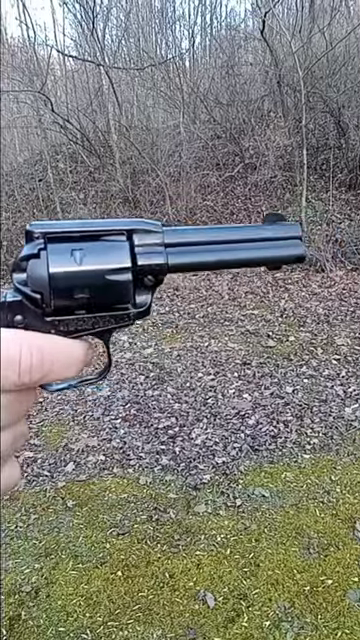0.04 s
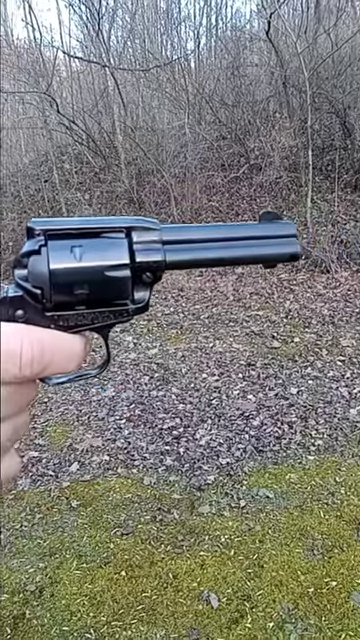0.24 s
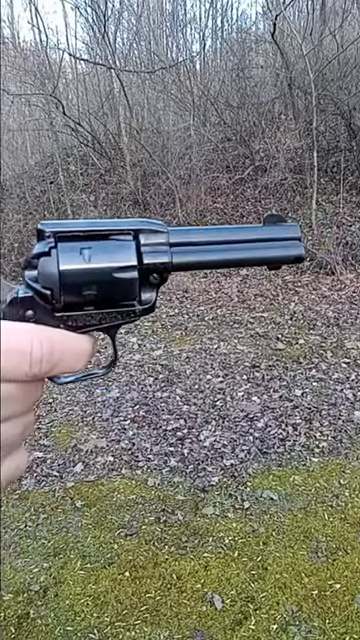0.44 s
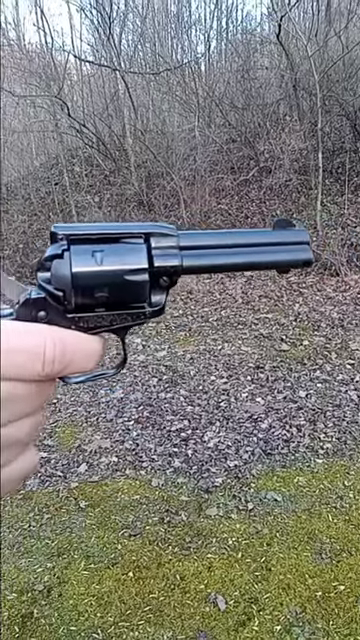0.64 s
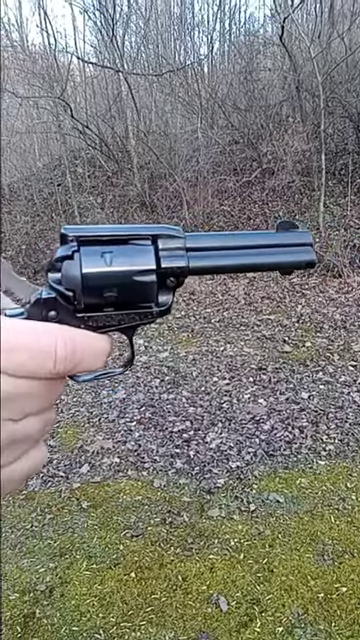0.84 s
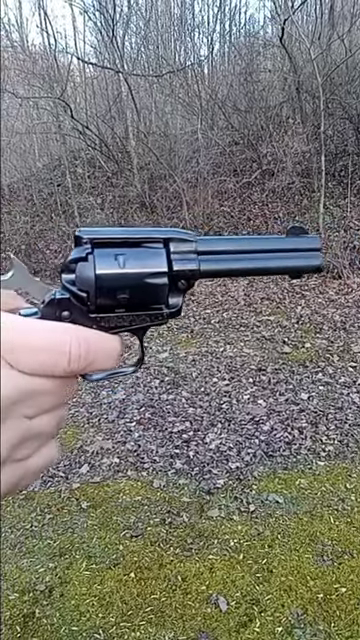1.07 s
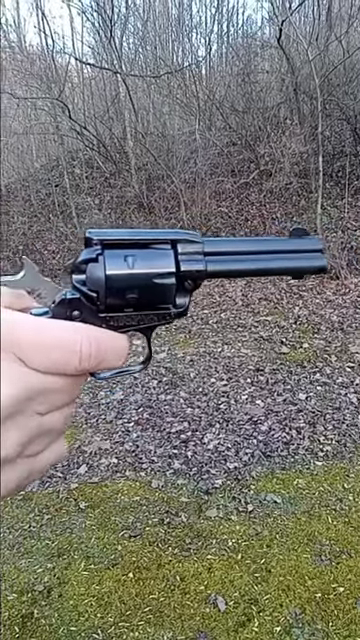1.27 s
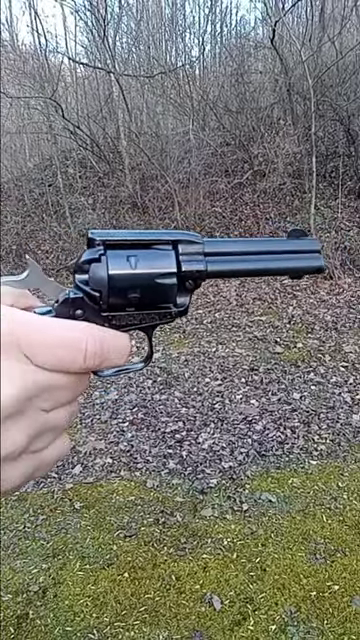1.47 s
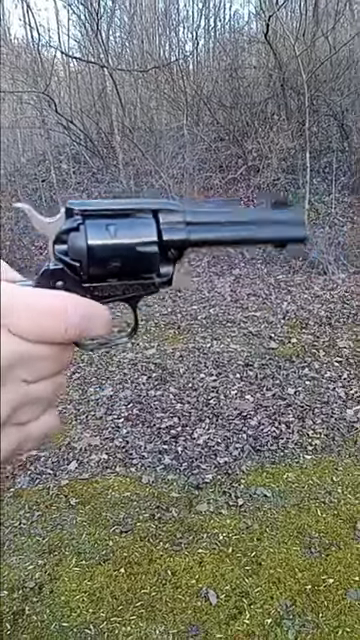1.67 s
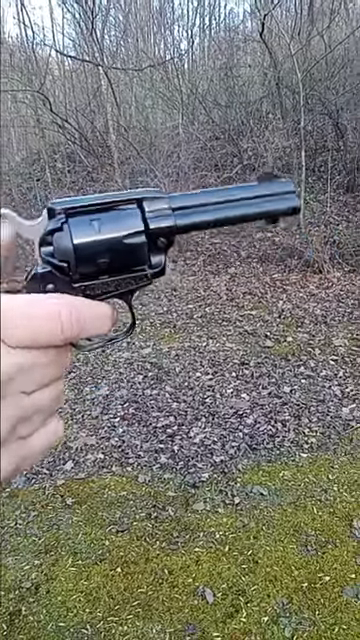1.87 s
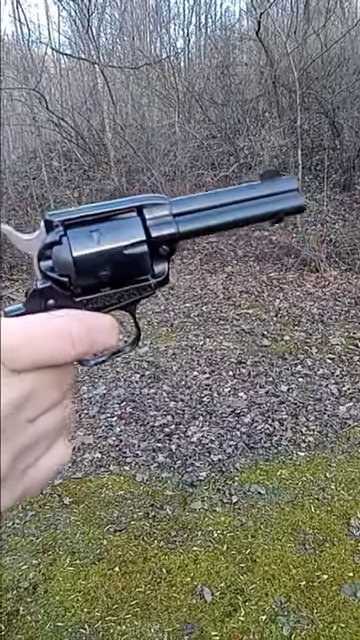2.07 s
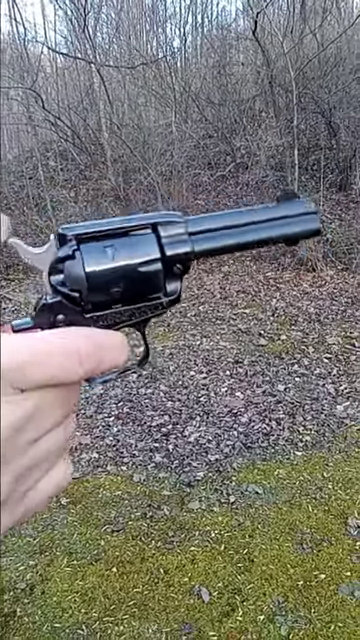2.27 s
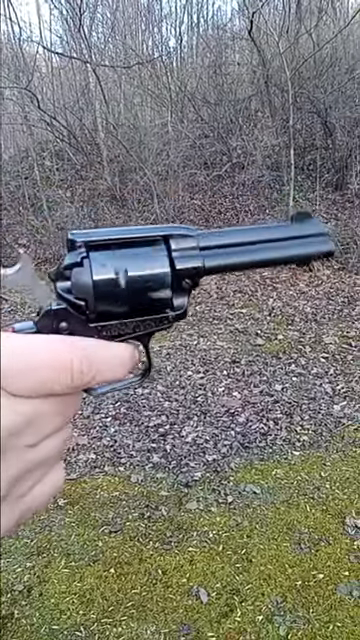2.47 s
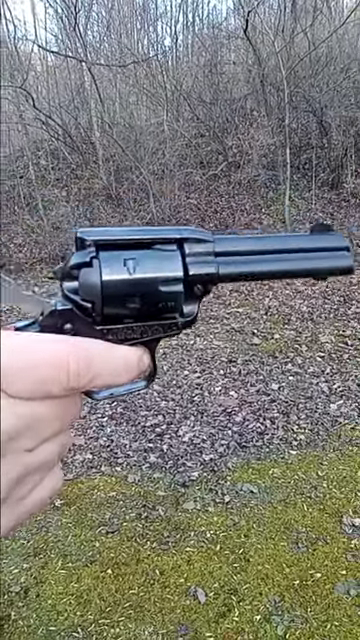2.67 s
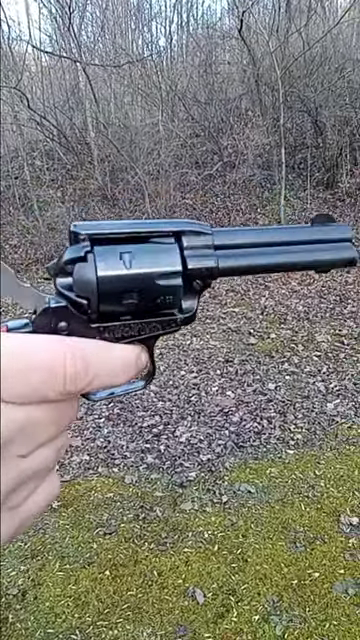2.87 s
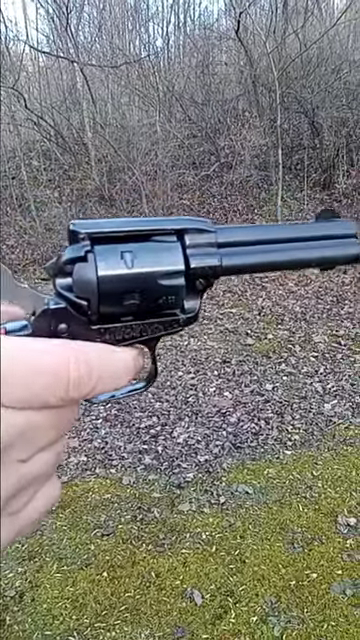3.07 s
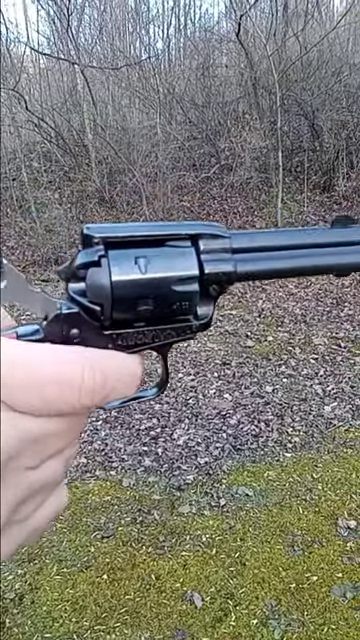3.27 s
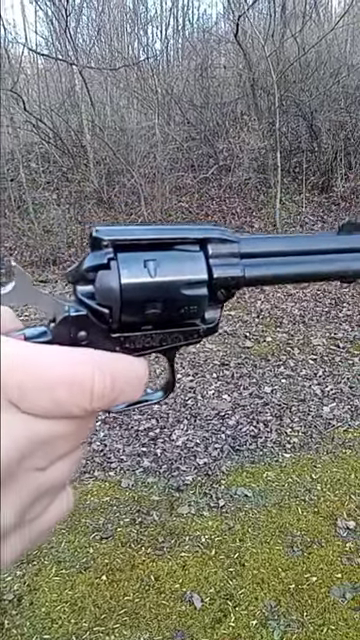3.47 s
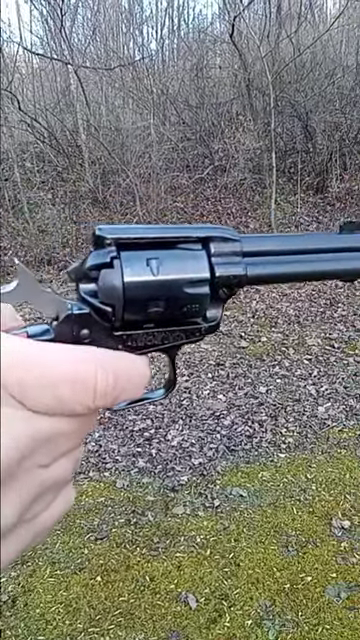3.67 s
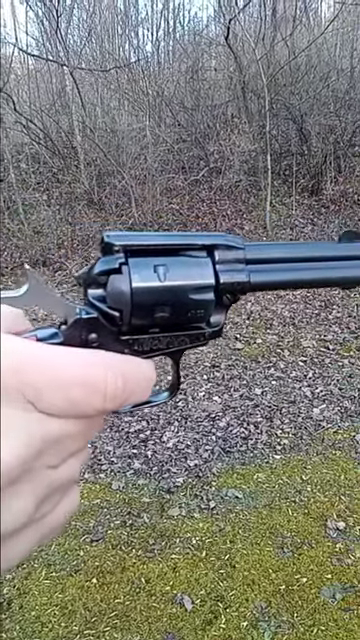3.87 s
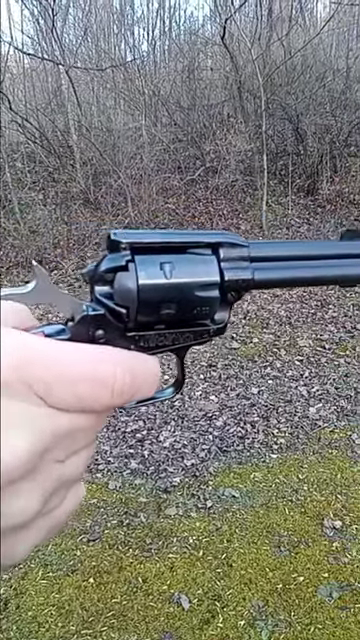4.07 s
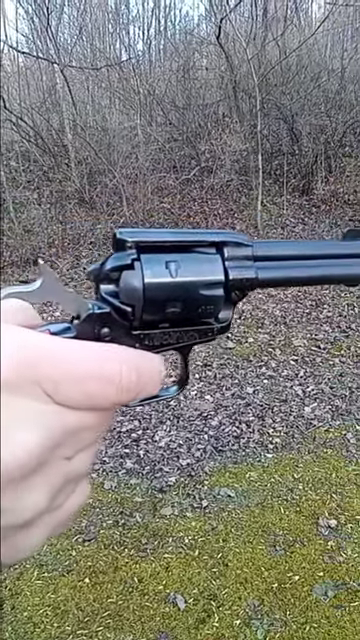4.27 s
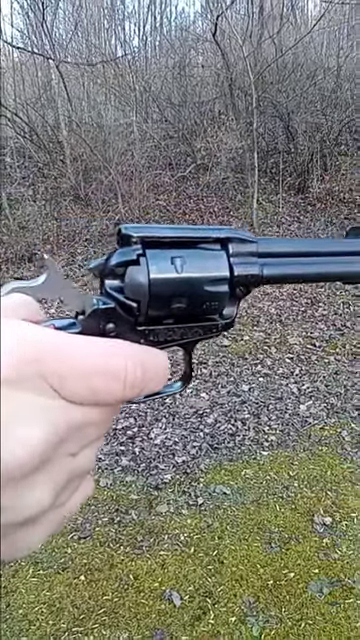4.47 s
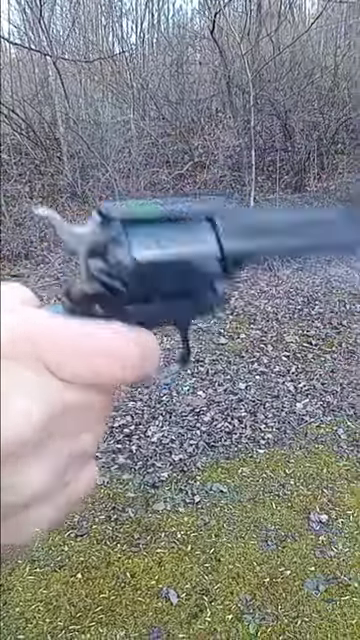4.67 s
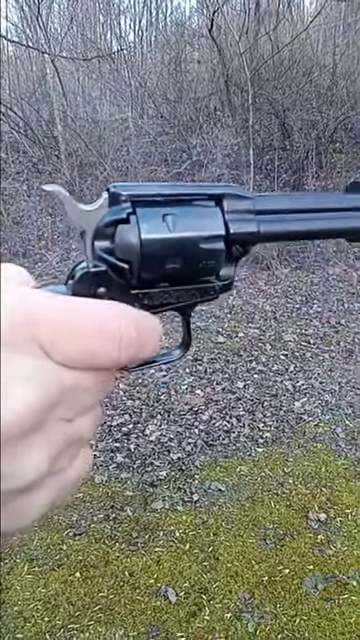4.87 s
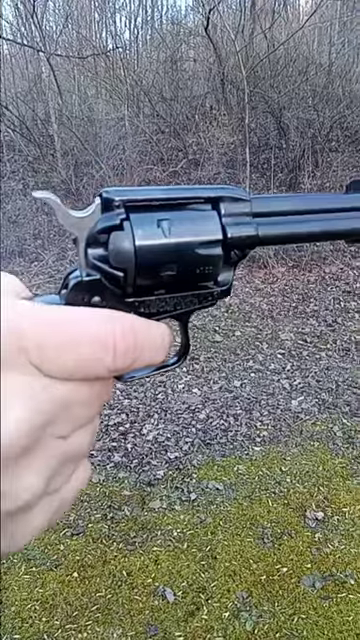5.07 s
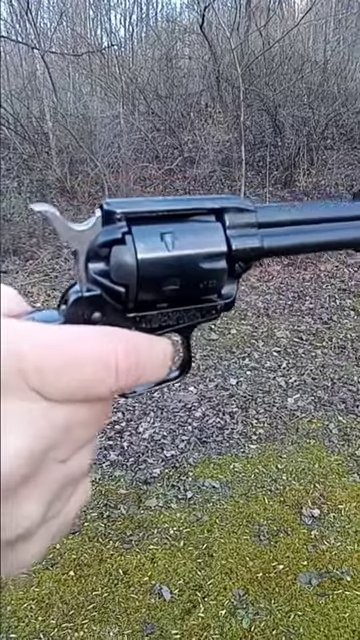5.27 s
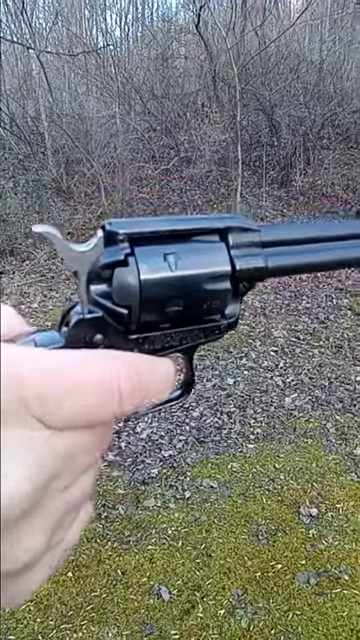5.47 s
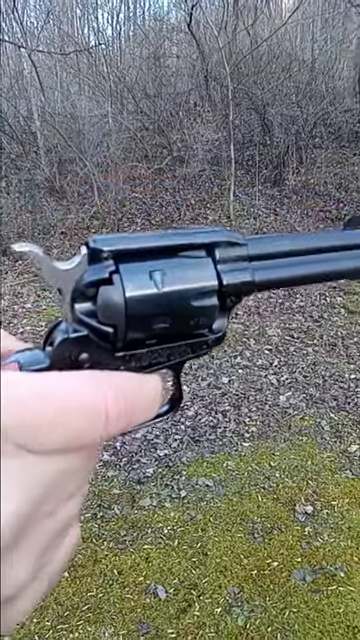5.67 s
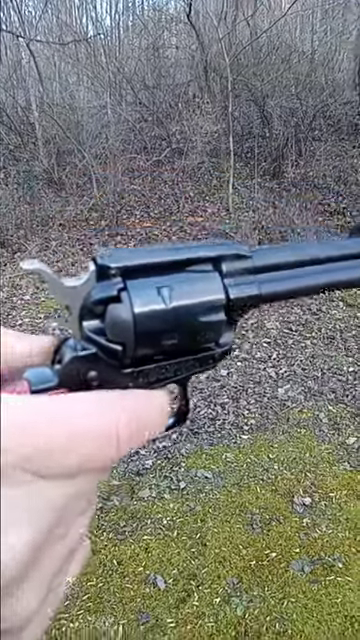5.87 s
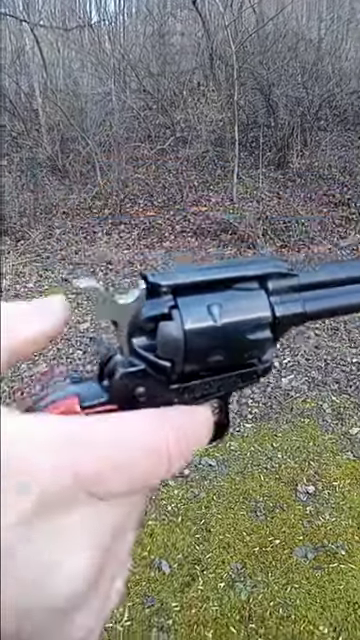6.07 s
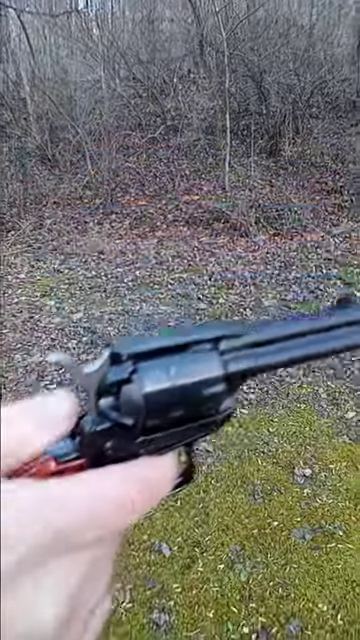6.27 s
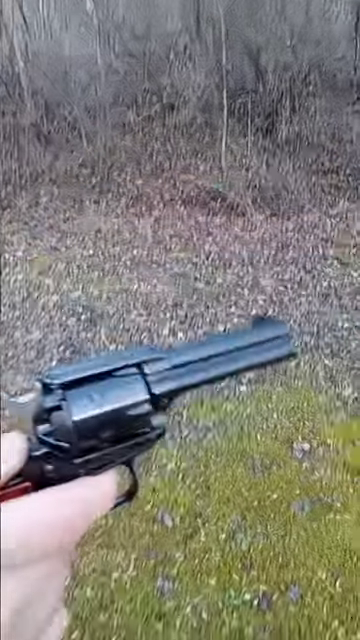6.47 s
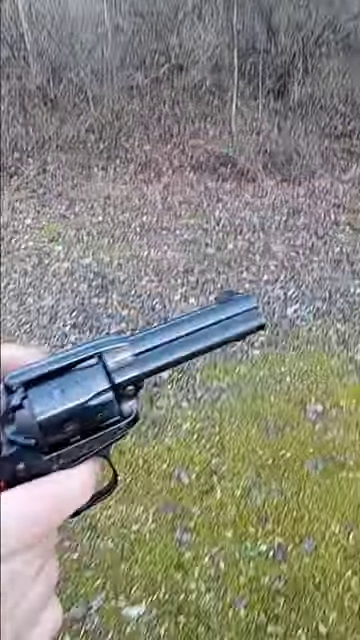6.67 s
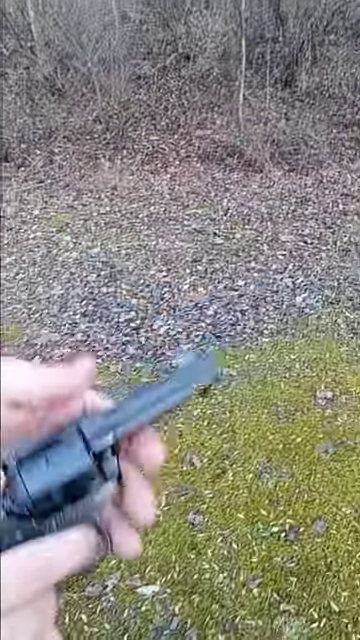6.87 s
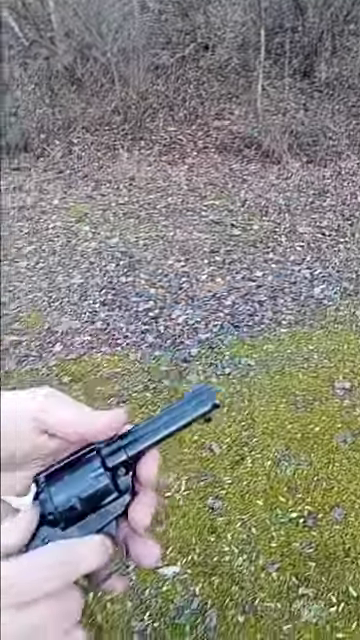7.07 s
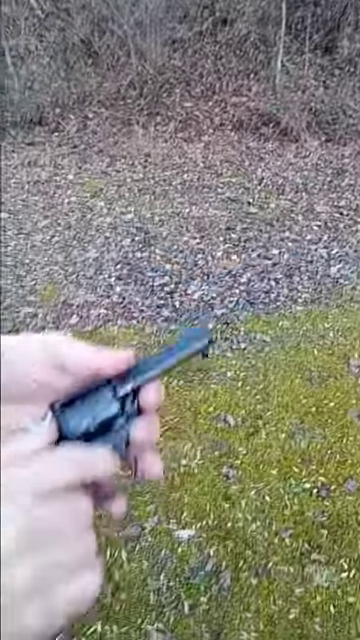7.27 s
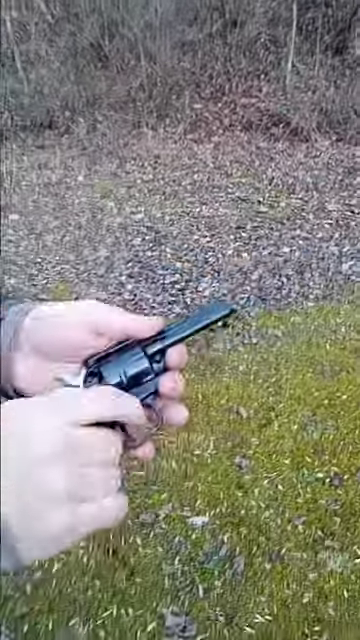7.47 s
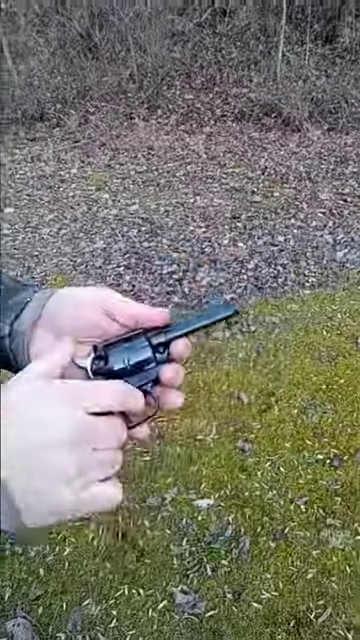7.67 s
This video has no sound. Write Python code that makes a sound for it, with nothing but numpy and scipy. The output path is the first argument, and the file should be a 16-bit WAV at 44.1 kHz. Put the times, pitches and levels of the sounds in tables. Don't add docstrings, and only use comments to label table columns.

```python
import sys
import numpy as np
from scipy import signal
from scipy.fft import rfft, irfft
from scipy.io import wavfile
from scipy.ndimage import uniform_filter1d, map_coordinates

SR = 44100
rng = np.random.default_rng(int(sys.argv[2]) if len(sys.argv) > 2 else 0)


def pcm_store(signal):
    levels = np.round(np.clip(np.atleast_2d(signal), -1, 1) * 32767)
    wavfile.write(sys.argv[1], SR, levels.astype(np.int16).T)


def voltage_ratio(level):
    return 10 ** (np.asarray(level, float) / 20)


N = 340452
T = np.arange(SR) / SR
LAG, GUN_LAG = 42, 70

# (time [s], blast [dB], hammer fall [dB], low push [dB], roar t60 [s])
SHOTS = [
    (1.5273, 6.5, -16.5, -8.5, .12),
    (4.6778, 4.5, -22, -4.5, 0.18),
]
# (time [s], peak [dB], main ring [Hz], left-right [dB], knock [dB])
COCKING = [(2.4402, -17.5, 5546, -7, -17), (2.5035, -49, 9570, -2, -20), (2.5118, -19, 4980, -8, -32),
           (2.5155, -23, 5340, -2, -31), (2.5645, -37, 8800, -7, -25), (2.5835, -19.5, 4870, -6, -27),
           (2.586, -21.5, 5170, -5, -25), (2.5922, -33, 9800, -1.5, -21), (2.6069, -15, 5860, -5.5, -10.5),
           (2.8075, -43, 5440, -5, -19), (2.8187, -20, 5340, 6, -30), (7.326, -44, 8900, 9, -8),
           (7.352, -52, 9000, -7, -19), (7.3879, -33, 9430, 1.5, -11), (7.3955, -33, 4620, 7, -12),
           (7.4035, -13, 6460, -3.5, -26), (7.411, -41, 6150, 18, -19)]
# (frequency [Hz], level [dB])
SNAP = [(500, -38), (2000, -25), (3500, -7), (5000, -1), (8000, 4.5), (12000, 1), (16000, 2)]
# (start [s], end [s])
HOLD_S = (2.425, 2.985)


def unit(x):
    return x / np.sqrt(np.mean(x ** 2) + 1e-20)


def along(points, hz):
    f, v = np.transpose(points)
    return np.interp(np.log(hz + 1), np.log(f + 1), v)


def wobble(rate):
    knots = rng.standard_normal(int(N * rate / SR) + 4)
    return map_coordinates(knots, [np.arange(N) * rate / SR])


def coloured(x, *spectra):
    size = 8192
    hz = np.fft.rfftfreq(size, 1 / SR)
    cepstrum = irfft(np.log(voltage_ratio(sum(along(s, hz) for s in spectra))))
    cepstrum[1:size // 2] *= 2
    cepstrum[size // 2 + 1:] = 0
    response = irfft(np.exp(rfft(cepstrum)))[:size // 2]
    return signal.oaconvolve(x, response[None], axes=1)[:, :N]


def add(pair, s, sound, pan_db=0):
    room = pair[:, round(s * SR):]
    sides = sound * voltage_ratio([[pan_db / 2], [-pan_db / 2]])
    room[:, :np.shape(sound)[-1]] += sides[:, :room.shape[1]]


def scattered(grain_db):
    # (frequency [Hz], likeness of the ports [0-1])
    likeness = [(100, 0.881), (600, 1), (1000, 0.17), (1600, 0.035), (4000, 0.3)]
    a, b = rfft(rng.standard_normal((2, N)) * voltage_ratio(grain_db * wobble(300)))
    alike = np.clip(along(likeness, np.fft.rfftfreq(N, 1 / SR)), 0, .99)
    return unit(irfft([a, alike * a + np.sqrt(1 - alike ** 2) * b], N))


def patchy(x, depth_db):
    z = signal.stft(x, nperseg=512)[2]
    field = rng.standard_normal(z.shape[1:])
    for axis in (0, 1):
        field = uniform_filter1d(field, size=6, axis=axis)
    return signal.istft(z * voltage_ratio(depth_db * unit(field)), nperseg=512)[1][:, :N]


def ports(pair, lag=LAG):
    # (frequency [Hz], level [dB])
    right_port = [(20, -35.5), (70, 1.5), (150, 1.5), (1200, 1), (1450, 4.5), (1750, 4), (6500, 0.5),
                  (8000, -2.5), (9300, 7.5), (10500, -2.5), (13200, -8.5), (15000, 3), (16000, -8)]
    # (frequency [Hz], level [dB])
    left_cavity = [(100, 5.5), (700, 9), (1450, 9), (2400, 21), (3000, 16), (3700, 4.5), (5500, 7.5),
                   (6500, 2.5), (8000, 1.5), (9300, -23), (11000, -18), (15000, -12)]
    left = coloured(pair[:1], right_port, left_cavity)
    late_left = np.pad(left, ((0, 0), (lag, 0)))[:, :N]
    return np.vstack([late_left, coloured(pair[1:], right_port)])


def muzzle_blast():
    # (frequency [Hz], level [dB])
    roar_colour = [(60, -16), (330, 4), (550, -1.5), (800, 1.5), (1300, -2.5), (2200, -8), (3200, -1.5),
                   (4000, -1), (7000, -1.5), (11000, -5.5), (16000, -6.5)]
    fall, wave, roar = np.zeros((3, 2, N))
    blast = (1 - T / 0.0002) * np.exp(-T / 0.0002)
    for s, blast_db, fall_db, _, roar_t60 in SHOTS:
        add(fall, s - .0068, voltage_ratio(fall_db - 60 * T / 0.026) * rng.standard_normal(SR))
        add(wave, s, -voltage_ratio(blast_db - 11.5) * blast)
        onset_dip = 1 - 0.51 * np.exp(-T / 0.0049)
        add(roar, s, voltage_ratio(blast_db - 11.5 - 60 * T / roar_t60) * onset_dip, pan_db=2)
    roar_noise = unit(coloured(scattered(grain_db=-2.0), roar_colour))
    return ports(wave + coloured(fall, SNAP) + roar * roar_noise, GUN_LAG)


def low_push():
    # (delay [s], level [dB], width [s])
    pulses = [(.0015, -6.5, .0007), (.0085, -2, .0013), (0.0125, -8, .0007), (.017, -12, .0013),
              (.027, -17, .0015), (0.093, -25, .002)]
    low = np.zeros((2, N))
    for s, _, _, push_db, _ in SHOTS:
        for delay, db, width in pulses:
            add(low, s, -voltage_ratio(push_db + db + 2) * np.exp(-((T - delay) / width) ** 2), pan_db=3.5)
    return ports(low)


def near_scatter():
    # (time [s], level [dB], left-right [dB])
    slaps = [(1.5803, -21.5, -13), (1.593, -21, -9), (1.607, -18, -5), (1.616, -8, -1.5),
             (1.684, -25.5, 6.5), (4.727, -23, -4.5), (4.742, -24, -2), (4.763, -13.5, 8), (4.779, -13, -2),
             (4.795, -21.5, 7), (5.123, -32.5, -5)]
    # (frequency [Hz], level [dB])
    near_colour = [(60, -14.5), (300, -9), (850, 3), (1500, -5.5), (3100, 1), (6000, -2), (10000, -7.5),
                   (13000, -9.5), (16000, -12)]
    scatter_db, scatter_t60 = -16.2, .65
    near = np.zeros((2, N))
    for shot in SHOTS:
        swell = 1 - np.exp(-T / 0.029)
        add(near, shot[0] + 0.0035, voltage_ratio(scatter_db - 60 * T / scatter_t60) * swell)
    for s, db, pan_db in slaps:
        add(near, s, voltage_ratio(db - 3.5 - 60 * T / 0.013) * (1 - np.exp(-T / .0005)), pan_db)
    lumps = patchy(scattered(grain_db=2.5), depth_db=3.0)
    return ports(near * unit(coloured(lumps, near_colour)))


def steel_ring(hz, db, rise, t60):
    return voltage_ratio(db - 60 * (T / t60) ** 2) * (1 - np.exp(-T / rise)) * np.sin(2 * np.pi * hz * T)


def flicker():
    return voltage_ratio(2.2 * wobble(25))


def shaken_frame():
    # (frequency [Hz], level after first shot [dB], level after second shot [dB], t60 [s])
    frame_modes = [(4522, -65, -40.5, .95), (5575, -65, -44, .75), (5830, -55, -65, .75),
                   (5981, -42.5, -65, .95), (9225, -41, -38.5, .58), (10075, -38, -44, .52)]
    lag_s, rise_s = .012, .07
    out = np.zeros((2, N))
    for hz, *levels_db, t60 in frame_modes:
        for shot, db in zip(SHOTS, levels_db):
            add(out, shot[0] + lag_s, steel_ring(hz, db, rise_s, t60), pan_db=11)
    return ports(out * flicker())


def struck_steel():
    # (frequency [Hz], level [dB], t60 [s])
    plate = [(2135, 0.1, .07), (2495, -12, .09)]
    hanger = [(4562, -20, .19), (6745, 0.1, .15), (10800, -22, .14)]
    gate = [(300, -29, .07), (1700, -28, .018), (3360, -8, .016), (4500, -3, .014)]
    # (time [s], level [dB], pitch ratio, share of free ring time)
    plate_hits = [(2.17, -36, 1.038, .3), (2.183, -35.5, 1.001, .85), (5.36, -43, 1.022, .7)]
    hanger_hits = [(2.163, -43, .995, 1.25), (4.764, -34, 1.001, .9), (5.115, -52, .99, .48),
                   (5.25, -47, .556, .55), (5.356, -48, 1.001, .4)]
    gate_hits = [(7.325, -51, .79, .7), (7.403, -34.5, 1.001, .99)]
    splash_db, splash_t60 = -6, .1
    rings, splash = np.zeros((2, 2, N))
    pieces = [(plate, plate_hits, .003, 3), (hanger, hanger_hits, .004, 3.5), (gate, gate_hits, .0013, 4)]
    for modes, hits, rise, pan_db in pieces:
        for s, db, pitch, share in hits:
            tones = [steel_ring(pitch * hz, db + mode_db, rise, share * t60) for hz, mode_db, t60 in modes]
            add(rings, s, sum(tones), pan_db)
    for s, db, *_ in hanger_hits:
        add(splash, s, voltage_ratio(db + splash_db - 60 * T / splash_t60) * rng.standard_normal(SR))
    return ports(rings * flicker() + coloured(splash, SNAP))


def action_clicks():
    # (time [s], peak [dB], main ring [Hz])
    loose_ticks = [(0.7352, -55, 5750), (3.3832, -53, 6520), (3.6734, -57, 5680), (3.8182, -50.5, 6320),
                   (3.9743, -53.5, 9040), (4.3544, -52, 7250), (4.4294, -57.5, 9260), (5.68, -52, 5600),
                   (5.9114, -52.5, 6270), (6.034, -52, 5440), (6.8974, -55, 5600), (6.9539, -55, 5800),
                   (7.0494, -60, 7050), (7.1758, -52, 6790), (7.1824, -56.5, 6580), (7.6003, -56.5, 5630)]
    # (frequency [Hz], level [dB], t60 [s], not used: each click's own t60 rules)
    small_parts = [(4860, -10, 0.037), (5460, -2, 0.02), (7500, -3, 0.031), (6930, 1.5, 0.015),
                   (9160, 4, 0.018), (8860, -13, 0.012), (10040, 0, 0.015), (9700, -12, 0.035),
                   (13200, -9, 0.013)]
    crack_t60, damp_hz = .0105, 5500
    crack, ring = np.zeros((2, 2, N))
    t = T[:SR // 10]
    rise = 1 - np.exp(-(t / .0009) ** 2)
    clicks = [(*row, .0138 - .00025 * max(row[1] + 25, 0)) for row in COCKING]
    ticks = [(*row, 0, -13.5, .0115) for row in loose_ticks]
    for s, db, hz, pan_db, knock_db, t60 in clicks + ticks:
        snap = voltage_ratio(db - 60 * t / crack_t60) * rise
        rattle = voltage_ratio(db - 52 - 60 * t / 0.045)
        add(crack, s - .001, voltage_ratio(0.5) * (snap + rattle) * rng.standard_normal(len(t)), pan_db)
        tones = 1.2 * np.sin(2 * np.pi * hz * t)
        tones += voltage_ratio(knock_db) * np.sin(2 * np.pi * 3050 * t)
        for part_hz, part_db, _ in small_parts:
            extra_fall = 60 * t / t60 * max(part_hz / damp_hz - 1, 0)
            strength = voltage_ratio(part_db - 8.5 + rng.normal(0, 2.5) - extra_fall)
            tones += strength * np.sin(2 * np.pi * (part_hz * t + rng.random()))
        add(ring, s - .001, voltage_ratio(-3) * voltage_ratio(db - 60 * t / t60) * rise * tones, pan_db)
    return ports(coloured(crack, SNAP) + ring, GUN_LAG)


def hand_rubs():
    # (time [s], level [dB], half length [s])
    rubs = [(6.94, -76, .012), (7.003, -62, .018), (7.335, -69, .012), (7.425, -66, .015),
            (7.49, -75, .025), (7.605, -70, .01)]
    # (frequency [Hz], level [dB])
    rub_colour = [(1200, -31), (2300, -1.5), (3000, -6), (3900, -16), (5500, 5), (6500, -10), (8500, -25),
                  (16000, -50)]
    level = np.zeros((2, N))
    for s, db, half in rubs:
        add(level, s - .05, voltage_ratio(db) * np.exp(-((T - .05) / half) ** 2), pan_db=10)
    skin = unit(coloured(scattered(grain_db=1.5), rub_colour))
    return ports(level * skin, GUN_LAG)


def wood():
    # (frequency [Hz], level [dB])
    wood_colour = [(60, -27), (190, -16.5), (300, -2.5), (550, 1), (1000, 2), (1400, -0.1), (2000, -6),
                   (3000, -5), (4000, -10), (6000, -12), (9300, -22.5), (10000, -23.5), (11000, -42.5),
                   (16000, -46.5)]
    # (time [s], roll [dB], roll ends after [s], far tail [dB])
    rolls = [
        (-1.6, 0.1, .45, 0.6),
        (1.5273, 0.1, .45, 1.1),
        (4.6778, 0.1, .51, -.9),
    ]
    # (full level [dB], swell [dB/s], ends later [s], fall [dB/s])
    hills = [
        (-30.5, 25, .03, 110),
        (-24.5, 45, -.04, 80),
        (-35, 45, -.05, 165),
    ]
    # (tail [dB], tail t60 [s], spreading [dB per tenfold time], steady rush [dB])
    distances = [
        (-39, 5.2, 0, -68),
        (-21.5, 2.6, 0, -56),
        (-54.5, 60, 27, -80),
    ]
    holds_db = (-7, -1.5, -11)
    arrive_s, full_s = .13, .33
    heard = rfft(ports(coloured(patchy(scattered(grain_db=0.05), depth_db=1.2), wood_colour)))
    hz = np.fft.rfftfreq(N, 1 / SR)
    low, lower_two = [1 / (1 + (hz / edge) ** 8) for edge in (1300, 3500)]
    now = np.arange(N) / SR
    held = np.clip(np.minimum(now - HOLD_S[0], HOLD_S[1] - now) / .01, 0, 1)
    out = 0
    for share, hill, far, hold_db in zip([low, lower_two - low, 1 - lower_two], hills, distances, holds_db):
        full_db, swells, later, falls = hill
        tail_db, t60, spread_db, rush_db = far
        power = voltage_ratio(rush_db) ** 2
        for s, roll_db, ends, far_db in rolls:
            t = np.maximum(now - s, 0)
            swell_db = swells * np.maximum(full_s - t, 0)
            fall_db = falls * np.maximum(t - ends - later, 0)
            roll = voltage_ratio(full_db + roll_db - swell_db - fall_db)
            spreading = spread_db * np.log10(np.maximum(t / ends, 1))
            tail = voltage_ratio(tail_db + far_db - 60 * np.maximum(t, ends) / t60 - spreading)
            power = power + (roll ** 2 + tail ** 2) * np.clip(t / arrive_s, 0, 1) ** 4
        band = irfft(heard * share, N)
        out = out + np.sqrt(power) * voltage_ratio(0.4 * wobble(14) + hold_db * held) * band / np.std(band.mean(0))
    return out


def ducking():
    down_db = np.zeros((2, N))
    for s, db, *_ in COCKING:
        share = 1 if s < HOLD_S[1] else .3
        add(down_db, s - .014, -1.5 * max(db + 21.5, 0) * share * np.exp(-(T / 0.064) ** 8))
    return voltage_ratio(uniform_filter1d(np.maximum(down_db, -11), size=SR // 200))


def wind():
    # (time [s], peak [dB], frequency [Hz])
    puffs = [(0.251, -50, 82.5), (0.3, -48.5, 85), (0.34, -54, 75.4), (0.414, -50, 79),
             (0.479, -49.5, 86.1), (0.517, -57, 134), (0.542, -43.5, 84.5), (0.58, -46, 72),
             (0.627, -44, 79.6), (0.658, -44, 95.3), (0.684, -45, 80), (0.741, -47.5, 73), (1.048, -59, 60),
             (1.401, -63.5, 121), (2.929, -44.5, 70), (3.183, -50, 90.6), (3.558, -50, 101.7),
             (3.609, -56.5, 56.5), (3.862, -53, 67), (3.919, -56, 73), (3.999, -55, 81.3), (4.312, -50, 67),
             (5.612, -42, 72.7), (5.72, -56.5, 108.6), (5.767, -55, 67.3), (7.249, -59.5, 79.5)]
    # (frequency [Hz], level [dB])
    hum_colour = [(30, -15), (80, 2), (150, -1), (300, -7.5), (600, -41)]
    out, t = np.zeros((2, N)), T[:SR // 5]
    for s, db, hz in puffs:
        turn = 2 * np.pi * hz * t
        gust = voltage_ratio(db + 2.5) * t / 0.024 * np.exp(1 - t / .012)
        thump = np.sin(turn) + 0.31 * np.sin(2.1 * turn + rng.normal())
        add(out, s - .004, gust * thump, pan_db=20.5)
    hum = unit(coloured(rng.standard_normal((2, N)), hum_colour))
    drift_db = 4.2 * np.array([wobble(7), wobble(2.3)])
    return out + hum * voltage_ratio([[-64], [-72]] + drift_db)


def hiss():
    # (frequency [Hz], level [dB])
    hiss_colour = [(1000, -5.5), (4000, 2.5), (10000, -1.5), (11000, -5), (14000, -5), (15000, 2.5),
                   (16000, -4.5)]
    return voltage_ratio(-84.3) * ports(unit(coloured(rng.standard_normal((2, N)), hiss_colour)))


def scene():
    shots = muzzle_blast() + low_push() + near_scatter()
    steel = shaken_frame() + struck_steel()
    gun_in_hand = action_clicks() + hand_rubs()
    return shots + steel + gun_in_hand + ducking() * wood() + wind() + hiss()


def thinned(x, slope, below_db, from_hz):
    hz, _, z = signal.stft(x, SR, nperseg=1024)
    power = uniform_filter1d(np.abs(z) ** 2, size=7, axis=1)
    level_db = 10 * np.log10(np.abs(power) + 1e-20)
    loudest_db = np.minimum(level_db.max((0, 1)), -30)
    over_db = uniform_filter1d(level_db - slope * (loudest_db + 40), size=5, axis=2)
    keep = (over_db > -40 - below_db) | (hz < from_hz)[:, None]
    return signal.istft(z * keep, SR, nperseg=1024)[1][:, :N]


def band_limit(x):
    return signal.sosfilt(signal.butter(12, 16530, fs=SR, output="sos"), x)


def record(dry):
    clipped = dry / (1 + np.abs(dry) ** 14) ** (1 / 14)
    mix = thinned(clipped, slope=2.3, below_db=47, from_hz=7000)
    return band_limit(mix)


dry = scene()
out = record(dry)
pcm_store(out)
```